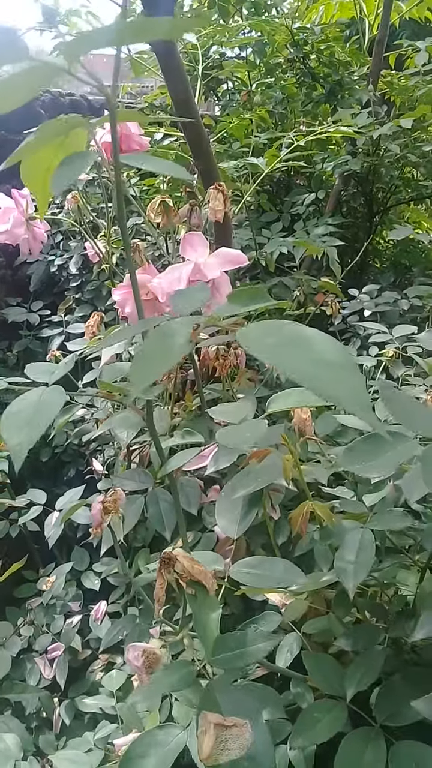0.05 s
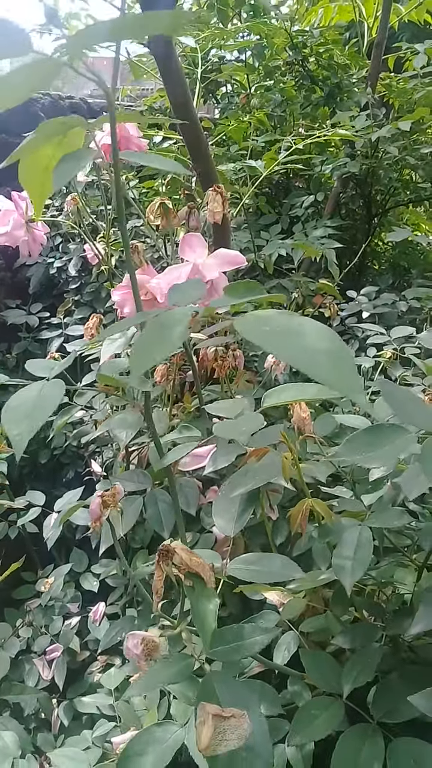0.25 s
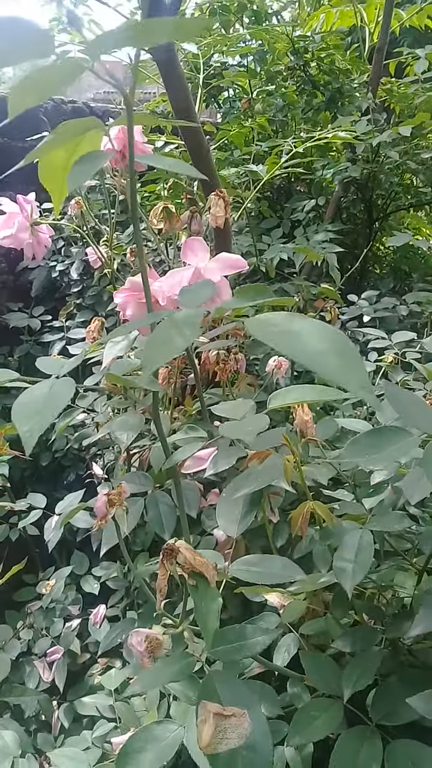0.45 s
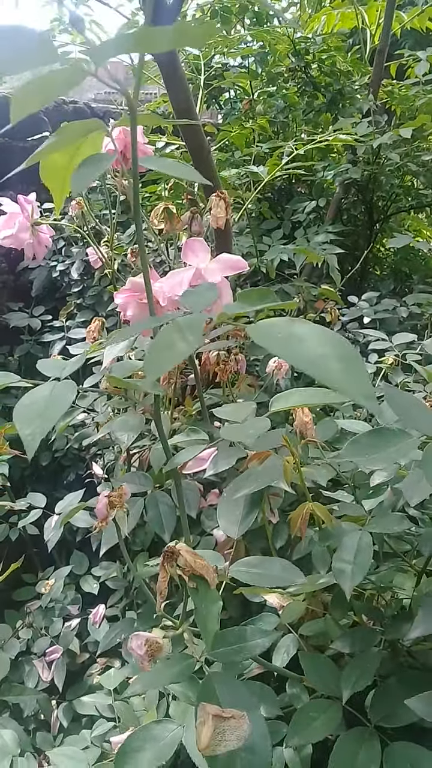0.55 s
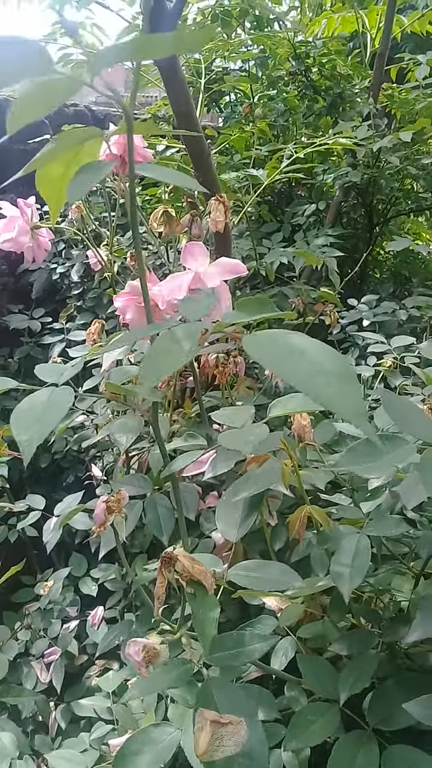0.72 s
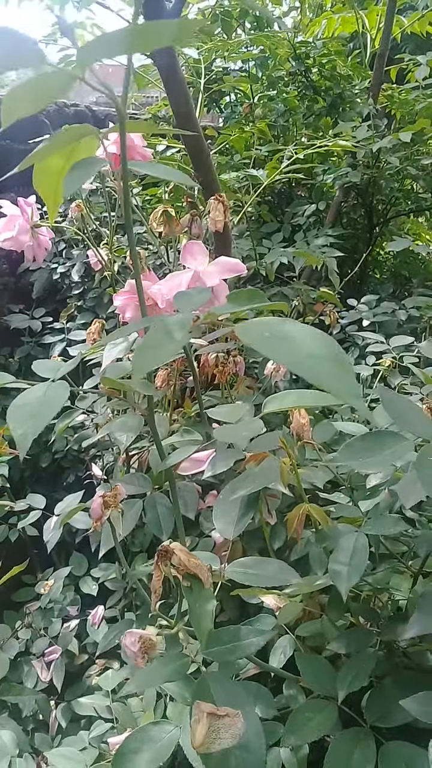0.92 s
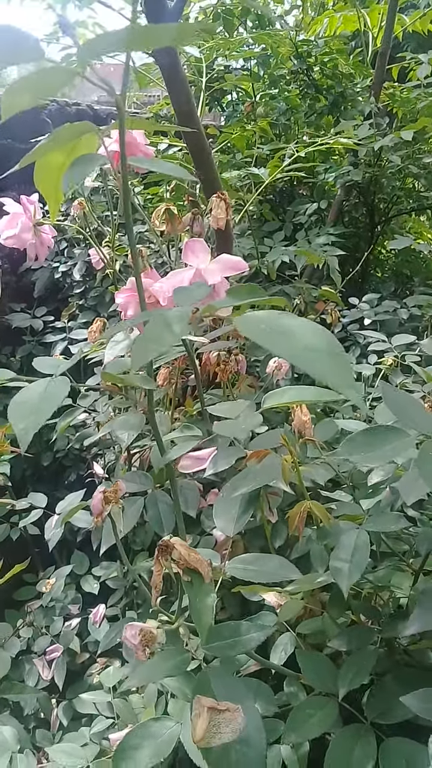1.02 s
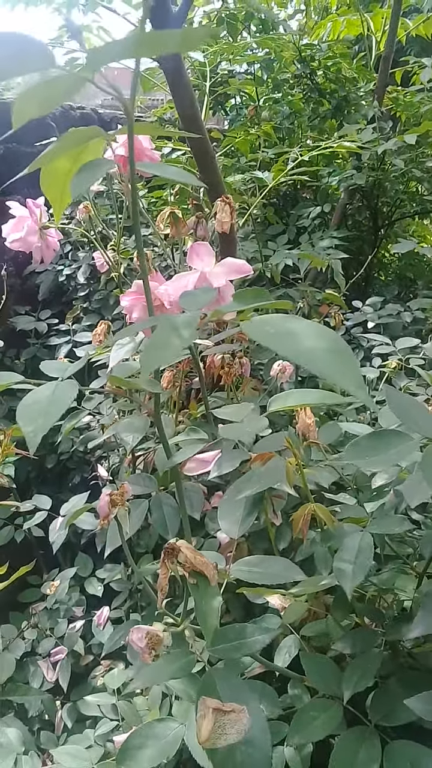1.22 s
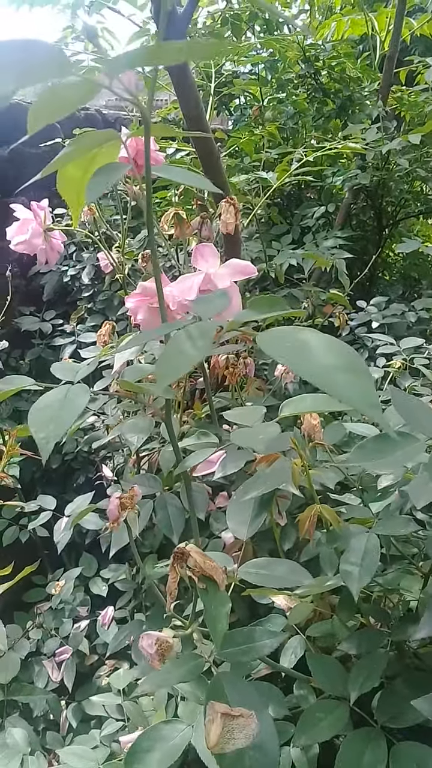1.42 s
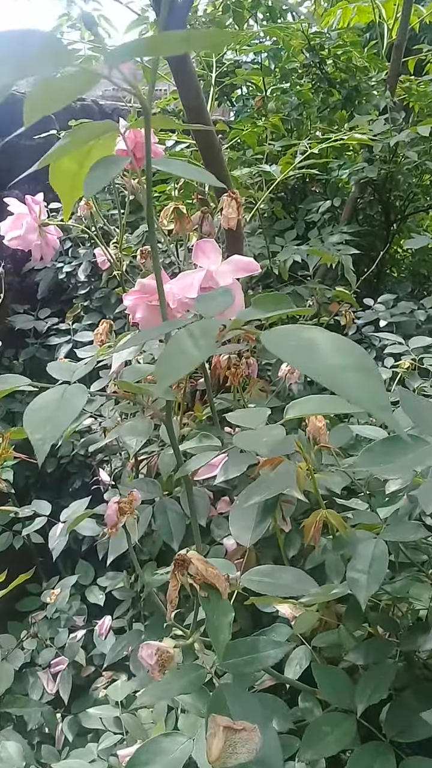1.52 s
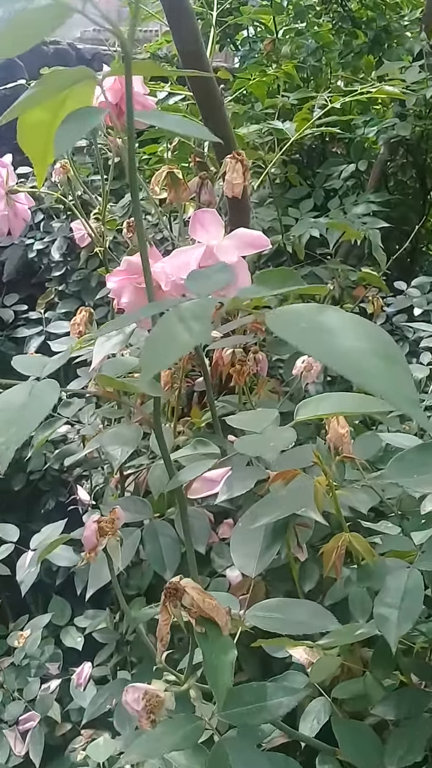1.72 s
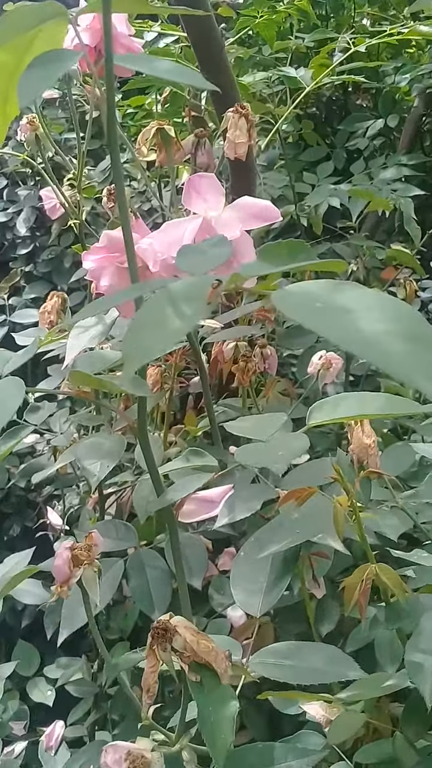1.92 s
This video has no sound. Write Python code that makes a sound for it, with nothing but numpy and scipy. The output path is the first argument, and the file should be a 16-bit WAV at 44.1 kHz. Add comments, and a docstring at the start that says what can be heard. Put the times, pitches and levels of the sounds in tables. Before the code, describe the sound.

A bird scolds with five short, high rasps, evenly spaced from the start until 1.1 seconds, echoing slightly in a garden. At about 0.9 seconds a crow-like bird gives one louder, lower, hoarse caw. Small birds add thin, gliding chirps throughout. A few soft bumps sound near the microphone between 1.4 and 1.7 seconds. Behind lie distant twittering, a faint far hoot in the first second and low outdoor rumble.

```python
"""A bird scolds in evenly spaced rasps in a walled garden; a crow-like bird gives one hoarse caw with a
low, breathy body, and small birds slip thin chirps in between. Rasps and caw follow the source-filter
principle: uneven pulses from the syrinx excite throat resonances. The chirps are gliding whistles.
Leaves and walls scatter the calls. Behind them lie far chatter, a faint far hoot, a low outdoor
rumble, two dull swishes, a faint hiss and a few soft bumps near the microphone."""
import sys
import numpy as np
from scipy import signal
from scipy.fft import rfft, irfft
from scipy.io import wavfile
from scipy.ndimage import uniform_filter1d

SR = 44100
rng = np.random.default_rng(int(sys.argv[2]) if len(sys.argv) > 2 else 0)


def transcribe(signal):
    """Save signal, clipped to [-1, 1], as a 16-bit WAV file at the path in sys.argv[1]."""
    frames = np.atleast_2d(signal).T
    limited = np.clip(frames, -1, 1)
    pcm = np.round(limited * 32767).astype(np.int16)
    wavfile.write(sys.argv[1], SR, pcm)


N = 85995
T = np.arange(N) / SR
HZ = np.fft.rfftfreq(N, 1 / SR)


def from_db(db):
    """Amplitude ratio of a level in decibels."""
    return 10 ** (np.asarray(db) / 20)


def rms_one(x):
    """Normalisation to unit rms."""
    return x / np.sqrt(np.mean(x ** 2) + 1e-20)


def evened(x):
    """Division by the running rms holds the short-term level at 1."""
    return x / np.sqrt(uniform_filter1d(x ** 2, size=400) + 1e-9)


def in_time(rows):
    """Linear interpolation of each column of a curve at every sample."""
    times, *columns = np.transpose(rows)
    return [np.interp(T, times, column) for column in columns]


def coloured(x, points):
    """Spectral shaping by (frequency [Hz], gain [dB]) points; rms 1."""
    hz, db = np.transpose(points)
    gain = from_db(np.interp(np.log(HZ + 1), np.log(hz), db))
    return rms_one(irfft(rfft(x) * gain, N))


def drift(rate_hz):
    """Low-passed noise gives a smooth random fluctuation; rms 1."""
    return rms_one(irfft(rfft(rng.standard_normal(N)) / (1 + (HZ / rate_hz) ** 4), N))


def resonance(x, hz, width_hz, order=2):
    """A resonance acts as a band-pass filter; rms 1."""
    edges = np.clip([hz - width_hz / 2, hz + width_hz / 2], 20, 19000)
    return rms_one(signal.sosfilt(signal.butter(order, edges, "band", fs=SR, output="sos"), x))


def envelope(start, length, attack_s, release_s):
    """A smooth amplitude gate: rise around the start, hold, fall around the end."""
    rise = 1 + np.tanh(2 * (T - start) / attack_s)
    fall = 1 + np.tanh(2 * (start + length - T) / release_s)
    return rise * fall / 4


def tone(hz):
    """A sinusoid whose phase is the integral of its frequency; rms 1."""
    return np.sqrt(2) * np.sin(2 * np.pi * np.cumsum(hz) / SR)


def garden(x, wet_db, t60_s=0.63, build_s=0.0061, cutoff_hz=7760):
    """Reverberation: walls and leaves add an exponentially decaying tail to the direct sound."""
    tail = rng.standard_normal(N) * from_db(-60 * T / t60_s) * (1 - np.exp(-T / build_s))
    tail /= np.sqrt(np.sum(tail ** 2))
    tail = signal.sosfilt(signal.butter(2, cutoff_hz, fs=SR, output="sos"), tail)
    return x + from_db(wet_db) * signal.fftconvolve(x, tail)[:N]


def leaves(x, grain_hz=254.4):
    """Dispersion: foliage delays each frequency a little differently, which softens sharp pulses."""
    knots = np.arange(0, SR, grain_hz)
    group_delay_s = 0.001622 * np.interp(HZ, knots, rng.uniform(0, 2.2, size=2000)[:len(knots)])
    phase_lag = 2 * np.pi * np.cumsum(group_delay_s) * SR / N
    return irfft(rfft(x) * np.exp(-1j * phase_lag), N)


def thicket(x, share, t60_s=0.1):
    """Scattering: a share of the energy arrives as a quick blur of reflections from bushes."""
    age = T[:SR // 4]
    blur = rng.standard_normal(len(age)) * from_db(-60 * age / t60_s)
    scattered = signal.oaconvolve(x, blur / np.sqrt(np.sum(blur ** 2)))[:N]
    return np.sqrt(1 - share) * x + np.sqrt(share) * scattered


def air(rise_db_per_s=0.1):
    """Outdoor rumble is broadband noise, densest at low frequencies and almost steady in level."""
    # Spectrum of the outdoor air: (frequency [Hz], relative spectral density [dB])
    spectrum = [(20, -6.5), (38, -6.5), (62, 6.5), (90, -1), (135, 2), (200, -13), (400, -14), (800, -16.5),
                (1500, -19), (2500, -26.5), (4000, -16.5), (5500, -23), (6800, -37), (8500, -42.5),
                (15500, -37.5)]
    db = -61.5 + 0.5 * drift(13) + rise_db_per_s * (T - T.mean())
    return from_db(db) * coloured(rng.standard_normal(N), spectrum)


def hiss():
    """Self-noise of the microphone, uncorrelated between the two channels."""
    # Spectrum of the hiss: (frequency [Hz], relative spectral density [dB])
    spectrum = [(100, -8), (2500, -27), (5000, -14.5), (7500, 1.5), (15500, 1)]
    return from_db(-79) * coloured(rng.standard_normal((2, N)), spectrum)


def low_noise_bands(fade_s=0.015):
    """Gated band-pass noise gives the caw's low, breathy body, and a dull swish before and after."""
    # A swish, the caw's body near 300 Hz, another swish:
    # (start [s], duration [s], level [dB], centre [Hz], bandwidth [Hz])
    bands = [(0.0, 0.46, -72, 181, 158), (0.886, 0.11, -63.5, 313, 150), (1.571, .12, -68.5, 228, 255)]
    out = np.zeros(N)
    for start, length, db, hz, width in bands:
        band = resonance(rng.standard_normal(N), hz, width)
        out += from_db(db) * envelope(start, length, fade_s, fade_s) * band
    return out


def bumps(t60_cycles=8, tick_db=-18.5):
    """Damped oscillation: each dull knock dies in a few cycles, along with a faint tick of noise."""
    # Soft knocks: (time [s], peak level [dB], ring frequency [Hz])
    knocks = [(1.3768, -46.5, 356), (1.414, -53.5, 318), (1.447, -50.5, 88), (1.502, -67, 108.4),
              (1.572, -63, 150), (1.578, -51.5, 358), (1.622, -59, 168), (1.661, -48, 200),
              (1.681, -46.5, 130)]
    tick = from_db(tick_db) * resonance(rng.standard_normal(N), hz=750, width_hz=1286)
    out = np.zeros(N)
    for start, db, hz in knocks:
        age = np.maximum(T - start, 0)
        decay = from_db(db - 60 * age * hz / t60_cycles)
        out += decay * (np.sin(2 * np.pi * hz * age) + tick * (T > start))
    return out


def hoot():
    """Random amplitude and frequency modulation make a long, faint, far tone waver."""
    # Course of the hoot: (time [s], pitch [Hz], level [dB])
    contour = [(0, 570, -68), (0.2, 576.6, -69), (0.36, 582, -75), (0.55, 575, -61), (0.63, 575, -80),
               (0.76, 593.5, -71), (0.82, 674, -70), (0.9, 627, -71), (1.0, 624, -100)]
    hz, db = in_time(contour)
    return from_db(db + 4.9 * drift(45)) * tone(hz * (1 + 0.0272 * drift(34)))


def twitter(fade_s=0.017, cutoff_hz=6400):
    """Superposed calls of far birds blur into flickering noise bands, dulled by distance."""
    # Far chatter: (start [s], duration [s], level [dB], centre [Hz], bandwidth [Hz])
    bands = [(0.0, 0.062, -68.5, 1600, 394), (0.0, 0.673, -62.5, 3610, 1720),
             (1.18, 0.19, -64.5, 3250, 920), (1.614, 0.182, -76, 2300, 443),
             (1.746, 0.17, -63.5, 4640, 1800)]
    chatter = np.zeros(N)
    for start, length, db, hz, width in bands:
        flicker = from_db(db + 1.1 * drift(30)) * envelope(start, length, fade_s, fade_s)
        chatter += flicker * resonance(rng.standard_normal(N), hz, width)
    return signal.sosfilt(signal.butter(8, cutoff_hz, fs=SR, output="sos"), chatter)


def chirps():
    """Frequency sweeps: each short whistle follows a parabola through three pitches."""
    # Small birds' whistles: (start [s], duration [s], first pitch [Hz], middle pitch [Hz],
    # last pitch [Hz], level [dB], share scattered by bushes [0-1])
    whistles = [(0.071, 0.018, 5230, 4860, 3900, -64, 0.8), (0.084, 0.021, 4200, 3710, 3240, -61.5, 0.84),
                (0.322, 0.027, 3940, 4670, 4770, -62, 0.2), (0.356, 0.027, 3300, 3450, 4200, -56.5, 0.08),
                (0.376, 0.016, 3865, 3340, 2900, -53, 0.14), (0.396, .03, 4400, 4800, 5330, -74, 0.5),
                (0.52, 0.016, 5400, 4750, 4200, -52.5, .3), (0.572, 0.052, 4000, 4393, 4770, -51.5, 0.44),
                (0.6, 0.051, 4550, 4693, 4680, -51.5, 0.2), (0.65, 0.048, 2370, 2360, 2300, -68.5, 1),
                (0.665, 0.049, 4400, 4630, 4700, -88, .7), (0.684, 0.043, 2680, 2870, 3050, -65.5, 0.8),
                (1.15, 0.031, 4490, 4446, 4390, -51, 0.55), (1.263, 0.01296, 3500, 3273, 2750, -51, 0.68),
                (1.341, .035, 3000, 3100, 3335, -65, 0.85), (1.763, 0.037, 3900, 4680, 5100, -58.5, 0.9),
                (1.808, 0.013, 4800, 5190, 5200, -57, .6), (1.829, 0.07, 3493, 3677, 4280, -54.5, 0.2),
                (1.903, 0.045, 2970, 3175, 3700, -60.5, 0.56)]
    wobble = 1 + 0.02205 * drift(177)
    out = np.zeros(N)
    for start, length, *pitches, db, share in whistles:
        progress = np.clip((T - start) / length, 0, 1)
        hz = np.polyval(np.polyfit([0, 0.5, 1], pitches, 2), progress)
        swell = np.abs(np.sin(np.pi * progress)) ** 0.85
        out += thicket(from_db(db) * swell * tone(hz * wobble), share)
    return out


def syrinx(pitch_hz, jitter, noise):
    """A bird's voice source is a quasi-periodic pulse train with a puff of noise at each pulse."""
    cycles = np.cumsum(pitch_hz * (1 + jitter * drift(160))) / SR
    pulses = np.diff(np.floor(cycles), prepend=0)
    puffs = rng.standard_normal(N) * np.cos(np.pi * cycles) ** 2
    return rms_one(pulses - pulses.mean()) + noise * rms_one(puffs)


def caw(rattle_depth=0.57):
    """Biphonation: a sagging harmonic voice and an arching tone, both chopped by a slowing rattle."""
    # Harmonic voice: (time [s], pitch [Hz], level [dB], rattle rate [Hz])
    voice_contour = [(0.872, 415, -75, 95), (0.897, 428, -41.5, 92), (0.93, 436, -38.5, 88),
                     (0.98, 432, -38, 86), (1.02, 418, -40.5, 80), (1.06, 406, -40.5, 72),
                     (1.097, 408, -40, 60), (1.11, 380, -57, 58), (1.14, 340, -75, 58)]
    # Second voice, below the strongest throat resonance: (time [s], pitch [Hz], level [dB])
    second_contour = [(0.875, 737.6, -63), (0.893, 787, -58.5), (0.915, 994, -50), (0.94, 1008, -59.5),
                      (0.975, 916.7, -51.5), (1.0, 825.5, -54), (1.06, 795.8, -55.5), (1.098, 739, -52.5),
                      (1.118, 603, -72), (1.142, 563, -64.5), (1.16, 557, -83)]
    # Frequency response of the throat: (frequency [Hz], relative gain [dB])
    throat = [(200, -55.5), (430, -36.5), (620, -15.5), (800, -23), (1000, -17), (1280, -10), (1500, -12.5),
              (1710, 3), (1900, -12), (2150, -14.5), (2400, -25), (2900, -29.5), (3600, -24), (4400, -36.5),
              (5600, -33.5), (6800, -40), (8200, -57), (9600, -52), (13000, -62)]
    pitch_hz, db, rattle_hz = in_time(voice_contour)
    second_hz, second_db = in_time(second_contour)
    rattle_cycles = np.cumsum(rattle_hz * (1 + 0.33 * drift(88))) / SR
    rattle = rms_one(1 + rattle_depth * np.cos(2 * np.pi * rattle_cycles))
    source = syrinx(pitch_hz, jitter=0.024, noise=0.4)
    voice = from_db(db) * evened(coloured(source, throat))
    second_voice = from_db(second_db) * tone(second_hz * (1 + 0.045 * drift(190)))
    sounding = (T > voice_contour[0][0]) & (T < second_contour[-1][0])
    return rattle * (voice + second_voice) * sounding


def scolder(attack_s=0.038, release_s=0.037):
    """Source and filter: harsh, noisy pulses excite one strong band and several weaker resonances."""
    # Scolding rasps: (start [s], duration [s], main band level [dB], its lower edge [Hz],
    # its upper edge [Hz], weaker resonances relative to it [dB])
    rasps = [(-0.07, 0.07, -50, 2760, 3900, -14), (0.194, 0.083, -49.5, 2790, 3880, -8.5),
             (0.473, 0.099, -51, 2730, 4000, -4.5), (0.745, 0.099, -49.5, 3160, 3910, -7.5),
             (1.014, 0.098, -45.5, 3196, 3846, -11)]
    # Weaker throat resonances: (centre [Hz], bandwidth [Hz], relative level [dB])
    formants = [(1470, 238, -1), (1855, 440, -3), (2716, 310, 4), (4540, 1400, -7), (6060, 1180, -2),
                (7340, 890, -13.5), (9670, 1100, -17)]
    source = syrinx(pitch_hz=199.7, jitter=0.22, noise=3.9)
    throat = rms_one(sum(from_db(db) * resonance(source, hz, width, order=3)
                         for hz, width, db in formants))
    out = np.zeros(N)
    for start, length, db, low_hz, high_hz, throat_db in rasps:
        main_band = evened(resonance(source, (low_hz + high_hz) / 2, high_hz - low_hz, order=4))
        gate = envelope(start, length, attack_s, release_s)
        out += from_db(db) * gate * (main_band + from_db(throat_db) * throat)
    return out


def scene():
    """Superposition: all sources sit in the centre; only the hiss differs between the ears."""
    birds = garden(leaves(scolder()), wet_db=-8)
    birds += garden(leaves(caw()), wet_db=-7)
    birds += garden(chirps(), wet_db=-6)
    rumble = air()
    far_birds = twitter() + thicket(hoot(), share=0.7)
    return birds + far_birds + rumble + bumps() + low_noise_bands() + hiss()


def record(dry, cutoff_hz=15700):
    """Band limiting: a steep low-pass filter removes the highest treble."""
    return irfft(rfft(dry) / (1 + (HZ / cutoff_hz) ** 200), N)


dry = scene()
out = record(dry)
transcribe(out)
```